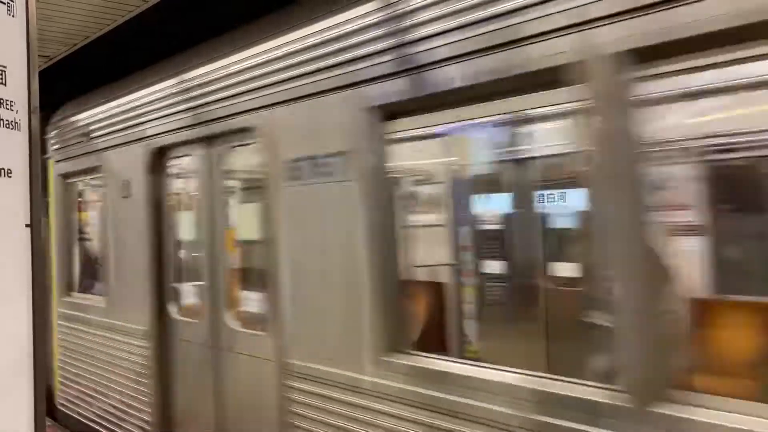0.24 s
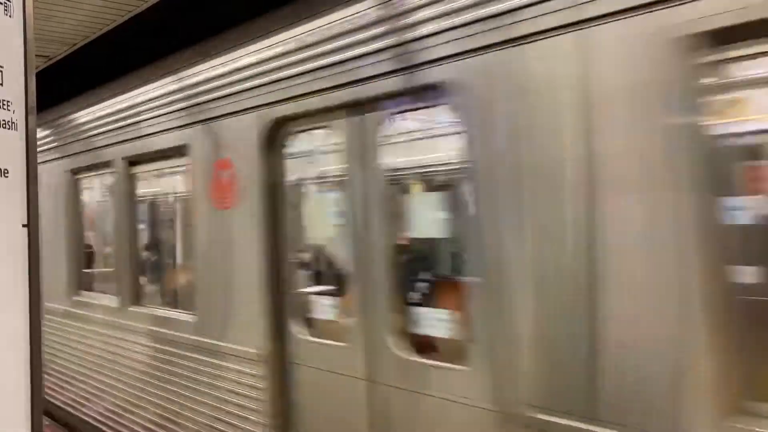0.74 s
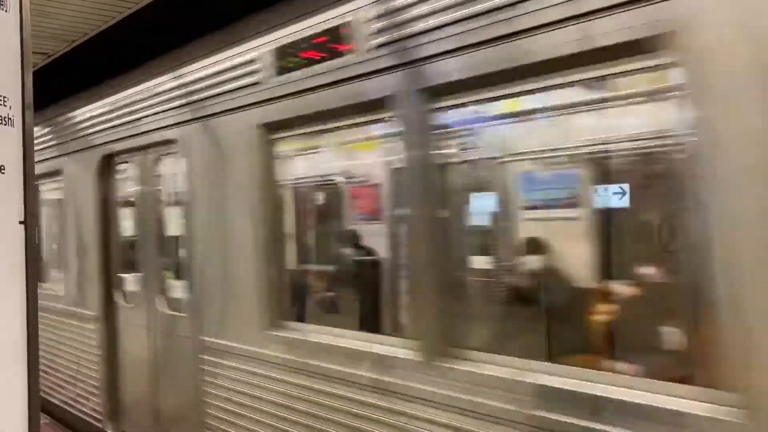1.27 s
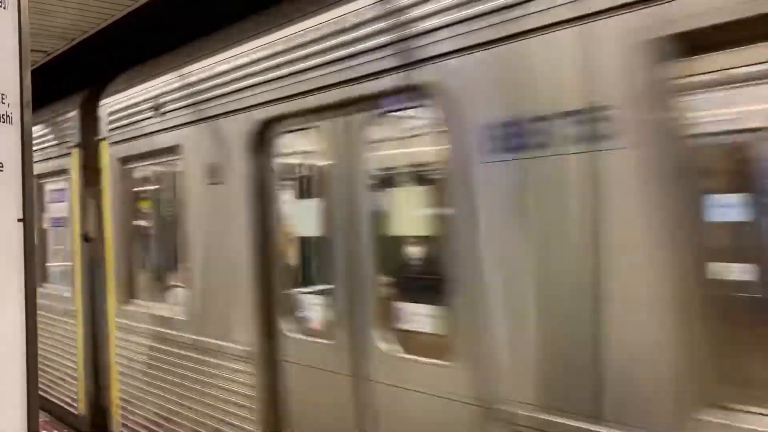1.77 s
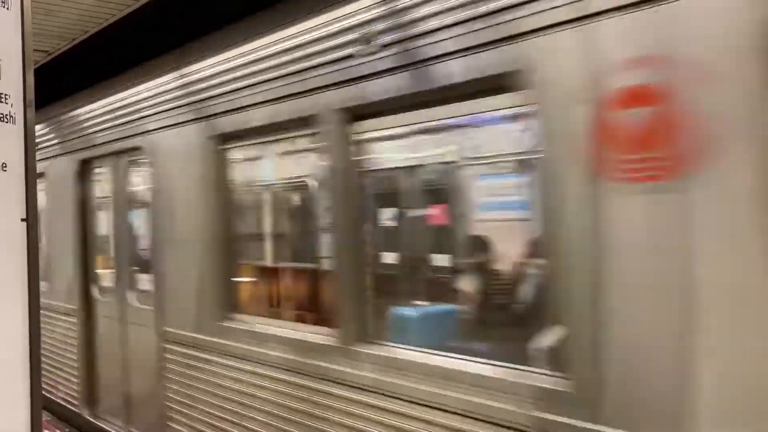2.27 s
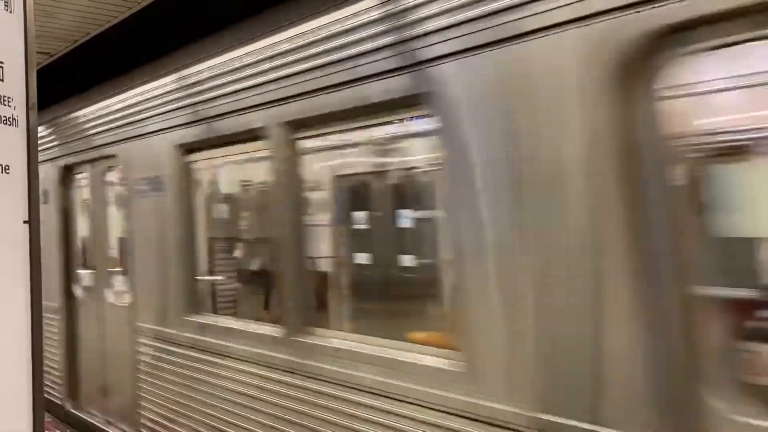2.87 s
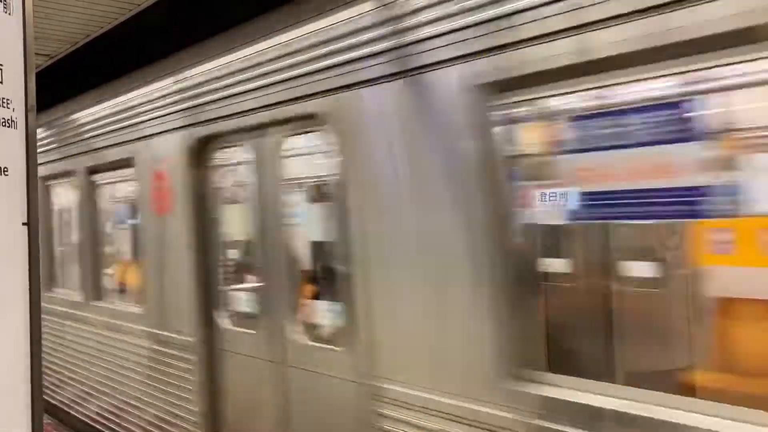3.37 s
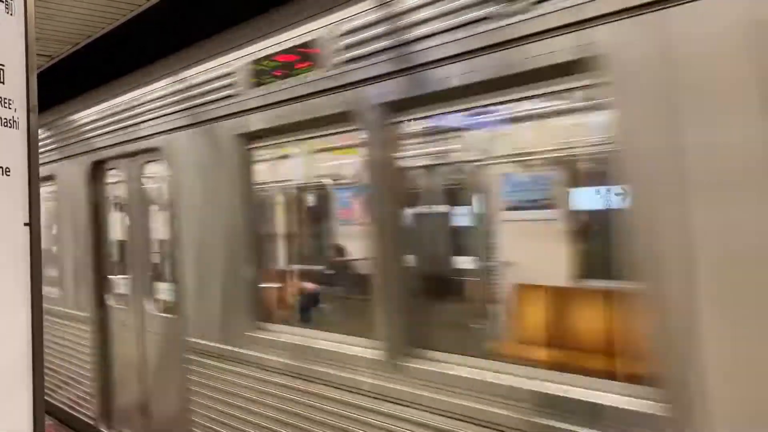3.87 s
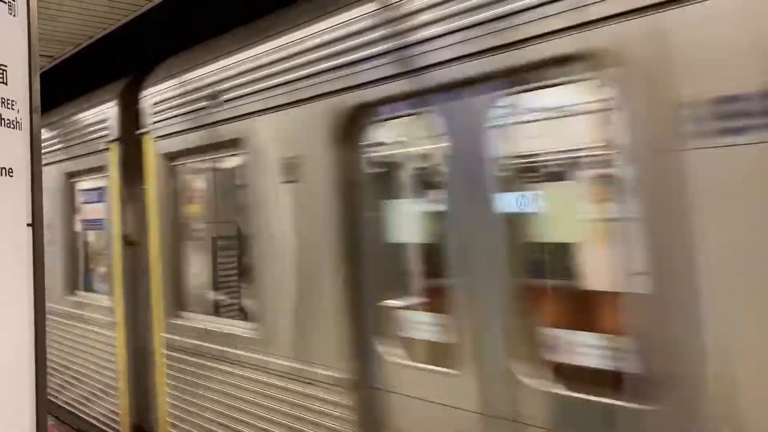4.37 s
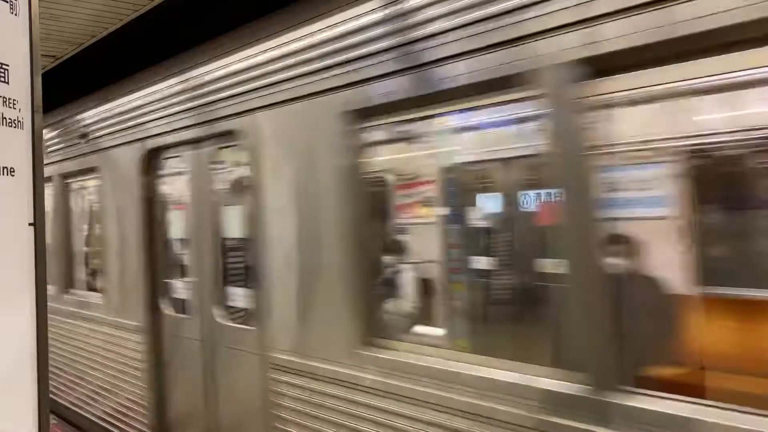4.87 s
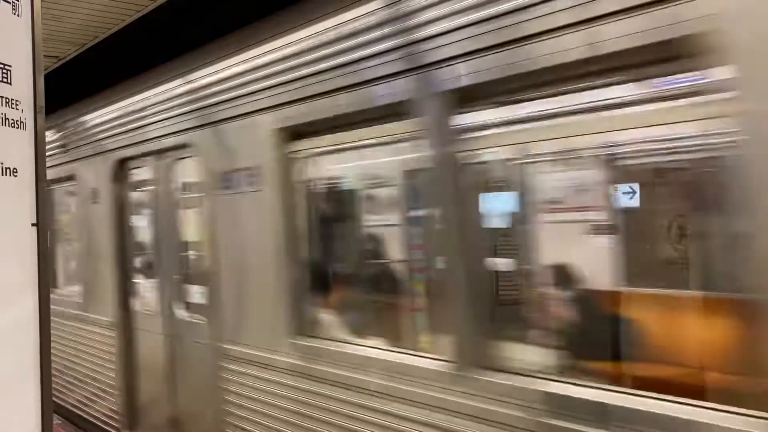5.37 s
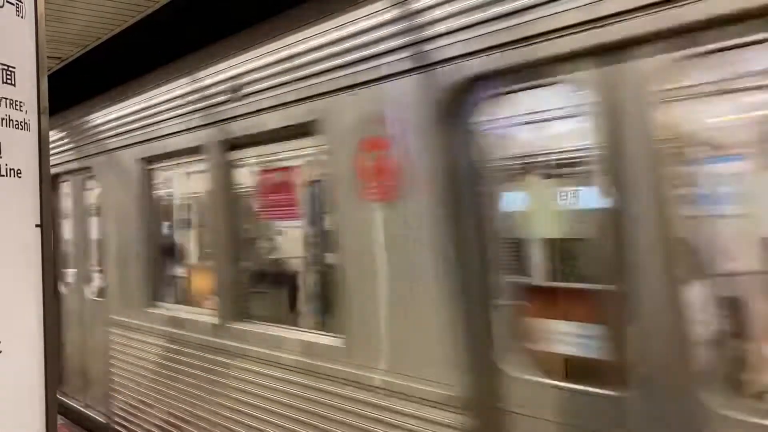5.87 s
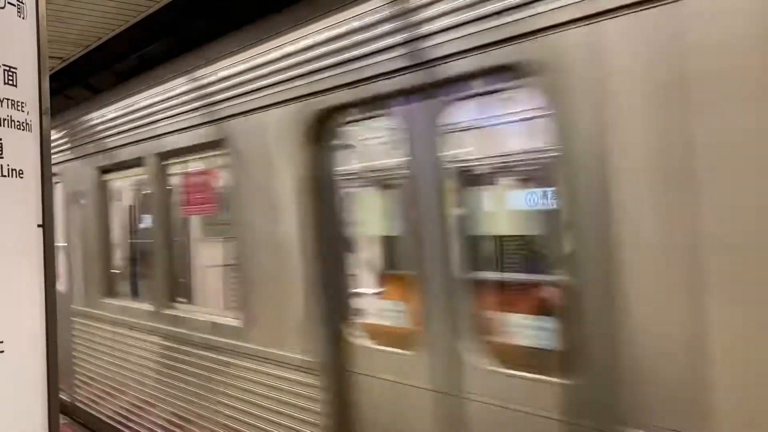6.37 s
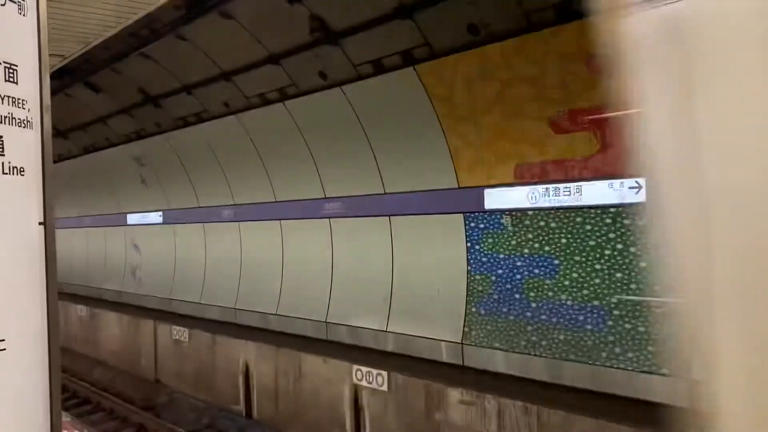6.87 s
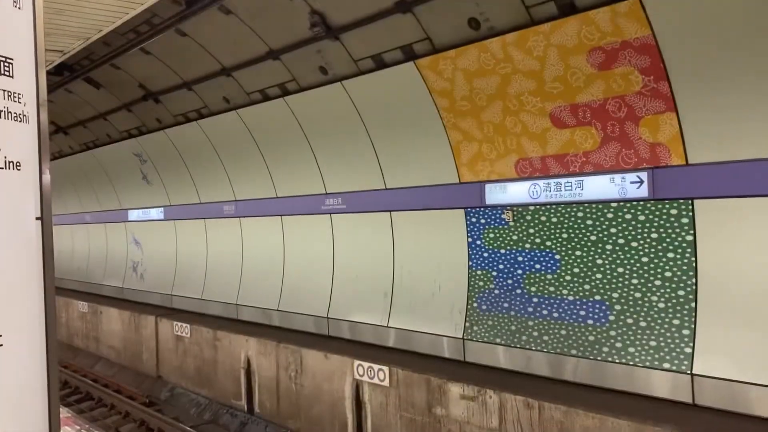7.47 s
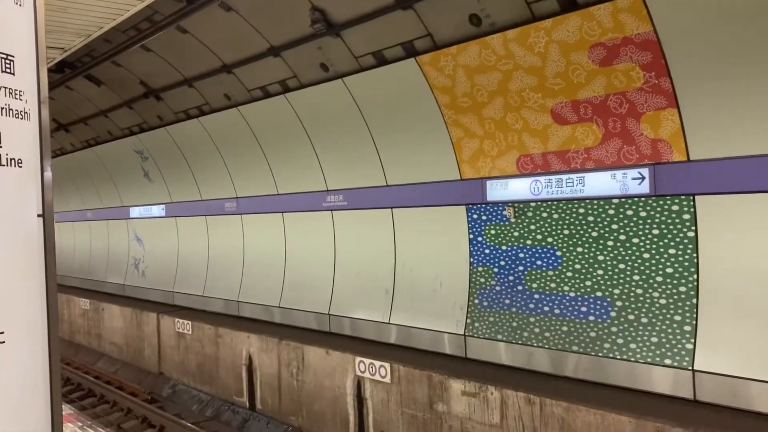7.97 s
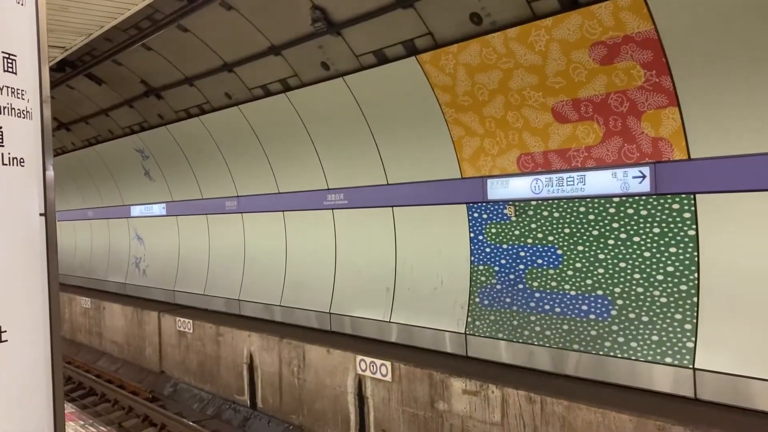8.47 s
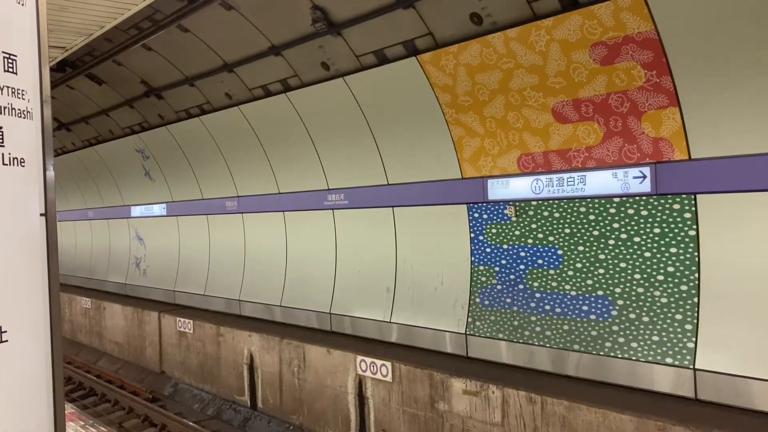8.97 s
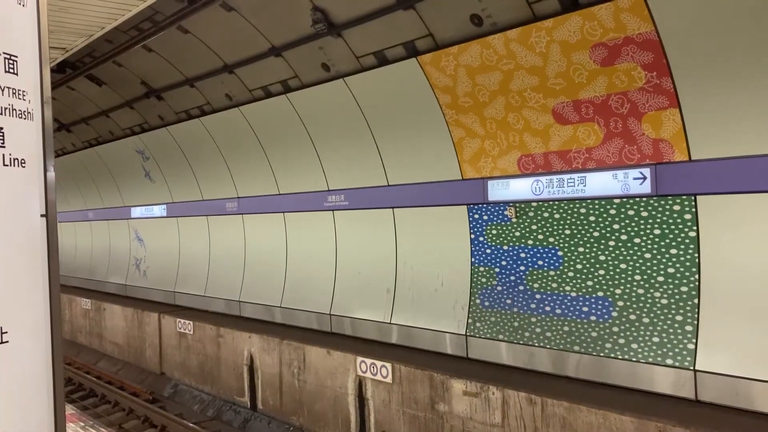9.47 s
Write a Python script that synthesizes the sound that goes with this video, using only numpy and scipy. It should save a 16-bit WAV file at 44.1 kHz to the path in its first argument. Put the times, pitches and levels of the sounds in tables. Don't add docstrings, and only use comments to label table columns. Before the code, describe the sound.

From the first instant an electric train is rolling close past an underground platform, a broad dark roar strongest in the lows and low mids, rough and flickering. Blurred gear hum near 450 Hz rises toward 560, while breathy fan whines climb from about 2.4 to 2.9 kHz, quickest around 1.5 to 2.6 s, with separate whines swelling and sinking per car. Irregular joint thumps, dull clanks, hollow panel booms and short knocks run throughout, heavy at 1.4, 2.25 and 4.1 s, with the biggest bang at 6.2 s. Soft air puffs come at 1.75, 2.3, 5.6 and 6.0 s. The tail passes near 6.8 s; brightness drops, but tunnel rumble surges around 8 and 8.5 s before sinking to a dull distant rumble by 9.7 s. Close stereo pickup, hard-walled station, faint hiss beneath.

```python
import sys
import numpy as np
from scipy import signal
from scipy.fft import rfft, irfft, next_fast_len
from scipy.io import wavfile
from scipy.ndimage import uniform_filter1d

SR = 44100
rng = np.random.default_rng(int(sys.argv[2]) if len(sys.argv) > 2 else 0)


def transcribe(u):
    v = np.clip(np.atleast_2d(u).T, -1, 1)
    q = np.round(v * 32767).astype(np.int16)
    wavfile.write(sys.argv[1], SR, q)


def boost_factor(decibels):
    exponent = np.asarray(decibels, float) / 20
    return 10 ** exponent


N = 429093

# f/Hz, level/dB per Hz
ROLLING_COLOUR = [(25, -42), (40, -13.5), (60, -0.5), (110, -3.5), (300, -0.5), (480, -0.5), (640, -7.5),
                  (1200, -12.5), (1900, -21.5), (2900, -24), (4500, -35.5), (6500, -46), (9000, -46),
                  (11000, -51), (13000, -61), (15000, -68)]
# t/s, loudness level/dB,
# treble level/dB relative to loudness (falls with distance)
TRAIN_PASS = [(0, -18.5, -30.5), (1.15, -16, -30.5), (1.5, -17, -29.5), (1.92, -16, -28.5), (2.4, -17, -28),
              (2.6, -17, -29.5), (4.05, -17.5, -30.5), (5.2, -17, -29.5), (5.75, -16.5, -27),
              (6.25, -16, -31), (6.95, -18, -30.5), (7.15, -16.5, -31.5), (7.97, -15.5, -35.5),
              (8.27, -19, -37), (8.48, -14, -35), (8.68, -15.5, -36), (8.95, -19.5, -39.5),
              (9.73, -23, -39)]
# f/Hz, share of loudness [ratio], share of nearness [ratio]
PITCH_FOLLOWS = [(60, 0.42, 0.84), (252, 0.96, 0.13), (600, 1.72, 0), (2630, 0.46, 0.93), (5500, 1.9, 1.16),
                 (9000, 0.82, 2), (11500, 0.9, 2.5), (15000, .8, 0)]


def rolling(shared_db, own_db):
    loud, near = [curve - curve.mean() for curve in in_time(TRAIN_PASS)]
    shake, follows = track_shake(), np.array(PITCH_FOLLOWS)
    edges = 25 * 2 ** (np.arange(29) / 3)
    lumpy_hz = 100
    together, roar = drift(7), 0
    white = rng.standard_normal((2, 2, N + SR // 4))
    for k, (low, high) in enumerate(zip(edges, edges[1:])):
        third_octave = signal.butter(2, [low, high], "band", fs=SR, output="sos")
        band = signal.sosfilt(third_octave, white[k % 2])[:, -N:]
        hz = np.sqrt(low * high)
        swell = at_hz(follows[:, :2], hz) * loud + at_hz(follows[:, ::2], hz) * near
        swell = swell + shake / (1 + (hz / 189) ** 2)
        flicker = own_db * (1 + lumpy_hz / hz) * np.clip(drift(13.5), -3.0, 1.6)
        roar = roar + boost_factor(at_hz(ROLLING_COLOUR, hz) + swell + shared_db * together + flicker) * band
    return boost_factor(-16.5) * rms_one(fading(at_ports(roar)))


# f/Hz, depth level/dB
ECHO_FADING = [(300, 1.0), (1000, 2), (2500, 1.5), (5500, 2.5), (9000, 3.5)]


def fading(pair):
    hz, _, cells = signal.stft(pair, SR, nperseg=1024)
    field = rng.standard_normal(cells.shape[1:])
    field = uniform_filter1d(field, size=3, axis=0)
    field = rms_one(uniform_filter1d(field, size=5, axis=1))
    gain = boost_factor(at_hz(ECHO_FADING, hz + 1)[:, None] * np.minimum(field, 1.8))
    even = np.sqrt(np.mean(gain ** 2, axis=1, keepdims=True))
    return signal.istft(cells * gain / even, SR)[1][:, :N]


# t/s, peak level/dB, thump f/Hz, clank level/dB
RAIL_JOINTS = [(0.02, -12.5, 70.5, -13.5), (0.74, -16, 65, -19), (1.365, -8, 78, -15),
               (1.411, -7, 131, -15), (1.63, -14, 76, -15), (2.167, -21, 76.5, -30),
               (2.251, -5.5, 80.2, -14.5), (2.479, -17, 70, -28), (2.588, -21, 64.3, -43),
               (3.069, -15, 152, -37), (3.17, -13, 66.4, -31), (3.644, -10, 61.9, -23),
               (3.741, -12, 65, -21), (4.124, -6, 67.4, -35), (4.491, -13.5, 69.6, -33),
               (4.647, -13, 64.5, -27), (4.842, -14, 68, -15), (5.144, -11, 69.4, -33),
               (5.258, -10.5, 84, -19), (5.421, -17.5, 69.6, -14), (5.588, -19, 68.7, -30),
               (5.776, -13, 78.6, -10), (6.219, 1.5, 96, -10), (6.33, -22, 153, -24), (6.658, -17, 72, -23),
               (7.204, -8, 83, -42), (7.381, -24.5, 76, -21), (7.499, -16, 80, -31), (7.63, -16.5, 72, -35),
               (7.868, -14.5, 70, -35), (8.511, -19, 153, -30), (8.527, -24, 84.3, -12),
               (9.019, -18, 64.7, -33), (9.44, -23, 68.5, -32)]


def joints():
    out, t = np.zeros((2, N + SR)), np.arange(SR // 3) / SR
    dull = signal.butter(2, [110, 900], "band", fs=SR, output="sos")
    for s, peak_db, thump_hz, clank_db in RAIL_JOINTS:
        turn = 2 * np.pi * thump_hz * t
        swing = np.sin(turn) + boost_factor(-3 - 60 * t / 0.29) * np.sin(2.58 * turn)
        thump = (1 - np.exp(-(t / 0.0057) ** 2)) * boost_factor(-60 * t / 0.1) * swing
        direct, other = signal.sosfilt(dull, rng.standard_normal((2, len(t))))
        rattle = rms_one(two_ports(direct, other, 300))
        clank = rattle * (1 - np.exp(-(t / 0.006) ** 2)) * boost_factor(-60 * t / 0.12)
        at = round(s * SR)
        out[:, at:at + len(t)] += boost_factor(peak_db) * thump + boost_factor(clank_db) * clank
    return out[:, :N]


def track_shake():
    rise_s, fall_s, shake_db, most_db = 0.034, 0.064, 17, 5
    t, power = np.arange(0, N, 64) / SR, 1
    for s, peak_db, _, _ in RAIL_JOINTS:
        envelope = np.exp(np.minimum((t - s) / rise_s, (s - t) / fall_s))
        power = power + boost_factor(2 * min(peak_db + shake_db, most_db)) * envelope
    return np.interp(np.arange(N) / SR, t, 10 * np.log10(power / power.mean()))


# t/s, f/Hz
GEAR_MESH = [(0, 452.2), (1.2, 470.7), (2.0, 488.6), (2.6, 525.7), (3.2, 532), (4.4, 549.7), (6.7, 563.7),
             (8, 560), (9.73, 566)]
# t/s, gear hum level/dB
BOGIES_PASSING = [(.15, -23.5), (.7, -24.5), (1.25, -23.5), (1.7, -37), (2.0, -19), (2.75, -27),
                  (3.25, -26), (3.9, -26.5), (4.8, -27), (5.7, -26.5), (6.5, -32), (7.0, -40)]
# t/s, f/Hz, level/dB
MAIN_FAN = [(0, 2390, -35.5), (.85, 2400, -39.5), (1.3, 2464, -35.5), (1.8, 2540, -48), (2.2, 2770, -43),
            (2.6, 2854, -39.5), (3.3, 2820, -41), (4.2, 2844, -45.5), (5.2, 2880, -39.5),
            (5.6, 2894, -37.5), (6.1, 2910, -38.5), (6.6, 2900, -45), (7.0, 2920, -43), (7.6, 2880, -42.5),
            (7.9, 2856, -43.5), (8.3, 2876, -47), (8.7, 2826, -47), (9.73, 2840, -48.5)]
# pitch share [ratio], smear f/Hz, level/dB
SIDE_FANS = [(.89, 140, -8), (1.1, 220, -6)]


def motors():
    (mesh_hz,), (fan_hz, fan_db) = in_time(GEAR_MESH), in_time(MAIN_FAN)
    t, waver_hz, pass_s = np.arange(N) / SR, 40, 0.32
    far_power = boost_factor(2 * -27) * boost_factor(2 * in_time(TRAIN_PASS)[0])
    near_power = sum(boost_factor(2 * db) * np.exp(-((t - s) / pass_s) ** 2) for s, db in BOGIES_PASSING)
    hum = blurred_tone(mesh_hz, width_hz=25.4, patchy_db=2.5)
    hum = hum + boost_factor(-4.5) * blurred_tone(.87 * mesh_hz, width_hz=44, patchy_db=1.0)
    whine = blurred_tone(fan_hz + waver_hz * drift(9), width_hz=90, patchy_db=1.6)
    others = 0
    for share, smear_hz, db in SIDE_FANS:
        side_hz = share * fan_hz + 2 * waver_hz * drift(2)
        others = others + boost_factor(db) * blurred_tone(side_hz, smear_hz, patchy_db=1.0)
    nearness = np.interp(t, (1.1, 1.4), [.2, 1])
    return np.sqrt(far_power + near_power) * hum + boost_factor(fan_db) * (whine + nearness * others)


# t/s, f/Hz, level/dB
LONE_FANS = [
    [(0, 2270, -37), (.45, 2318, -38), (.9, 2290, -37), (1.2, 2370, -50)],
    [(.9, 2100, -52), (1.15, 2140, -42), (1.7, 2046, -47), (2.0, 2060, -52)],
    [(1.1, 2570, -48), (1.5, 2600, -39), (1.95, 2730, -41), (2.1, 2880, -54)],
    [(1.5, 2230, -54), (1.7, 2316, -41), (1.95, 2480, -36), (2.15, 2530, -50)],
    [(1.9, 2290, -44), (2.05, 2357, -35), (2.25, 2634, -44), (2.42, 3120, -40), (2.6, 2960, -50)],
    [(2.6, 2620, -52), (2.75, 2690, -42), (2.9, 2850, -44), (3.0, 2950, -52)],
    [(2.75, 2280, -49), (2.95, 2320, -38), (3.3, 2500, -45), (3.45, 2550, -52)],
    [(4.5, 2420, -52), (4.75, 2460, -45), (5.25, 2410, -42), (5.7, 2430, -40), (6.3, 2420, -44)],
    [(5.3, 2200, -52), (5.6, 2200, -39), (5.9, 2200, -49)],
]


def car_fans():
    out = np.zeros((2, N))
    for car in LONE_FANS:
        heard = slice(round(car[0][0] * SR), round(car[-1][0] * SR))
        hz, db = in_time(car)[:, heard]
        out[:, heard] += boost_factor(db) * blurred_tone(hz, width_hz=44.0, patchy_db=3.0)
    return out


def blurred_tone(hz, width_hz, patchy_db):
    turn, size = np.exp(2j * np.pi * np.cumsum(hz) / SR), len(hz)
    direct, other = [np.real((drift(width_hz, size) + 1j * drift(width_hz, size)) * turn) for port in range(2)]
    return rms_one(boost_factor(patchy_db * drift(7.2, size)) * two_ports(direct, other, hz.mean()))


# f/Hz, level/dB, t60/s
RIM_MODES = [(1772, 0, .02), (2097, 2, .018), (2377, 1, .015), (2610, 1, .015), (2860, 0, .015),
             (3350, -1, .012)]


def wheel_rims():
    loud_db, near_db = in_time(TRAIN_PASS)
    return boost_factor(0.83 * loud_db + 0.45 * near_db - 13.0) * wheel_ring(RIM_MODES, knocks_per_s=300)


# f/Hz, level/dB, t60/s
PANEL_MODES = [(218.6, -3.5, 0.11), (282, -10.5, 0.18), (350.4, -6, 0.27), (408.2, -1, 0.15),
               (830, -4, 0.051)]


def body_panels():
    loud_db, near_db = in_time(TRAIN_PASS)
    return boost_factor(loud_db + 0.33 * near_db + 0.1) * wheel_ring(PANEL_MODES, knocks_per_s=120)


def wheel_ring(modes, knocks_per_s):
    knocks = (rng.random((2, N)) < knocks_per_s / SR) * rng.standard_normal((2, N)) + 1e-18
    dealt, out = rng.integers(0, len(modes), N), 0
    for k, (hz, level_db, t60) in enumerate(modes):
        r, w = boost_factor(-60 / (t60 * SR)), 2 * np.pi * hz / SR
        ring = signal.lfilter([0, np.sin(w)], [1, -2 * r * np.cos(w), r * r], knocks * (dealt == k))
        out = out + boost_factor(level_db) * ring
    soft = signal.butter(4, 1.77 * modes[-1][0], fs=SR, output="sos")
    return rms_one(at_ports(signal.sosfilt(soft, out)))


# t/s (at its height), level/dB, f/Hz
PANEL_BOOMS = [(0.385, -11.5, 497), (0.435, -14.5, 191), (0.548, -6.5, 405), (1.075, -23, 266),
               (0.13, -14, 390), (0.22, -11, 396), (0.735, -14, 369), (1.045, -12, 465), (1.326, -18, 313),
               (1.383, -9, 189), (1.707, -9, 316), (1.864, -8.5, 447), (1.445, -13.5, 456.2),
               (1.91, -13, 453), (1.975, -7, 405), (1.988, -10, 200), (2.093, -13, 190), (2.248, -12, 408),
               (2.445, -17, 505), (2.82, -13, 528), (2.271, -11, 158), (2.524, -12.5, 160),
               (2.898, -10.5, 377.5), (3.156, -13.5, 397), (3.296, -10.5, 180), (3.461, -16, 491),
               (3.746, -13, 312), (3.905, -12, 181), (4.234, -16, 400), (4.345, -16, 394),
               (4.693, -11.5, 160), (4.701, -10.5, 546), (5.144, -20, 365), (5.595, -15, 557),
               (5.82, -15.5, 410), (6.412, -14, 428.5), (5.327, -9.5, 278.4), (5.746, -13, 410),
               (5.771, -12, 280), (5.909, -10, 282), (6.09, -20, 181), (6.219, -3, 409),
               (6.224, -15.5, 272), (6.229, -14.5, 141), (6.336, -12.5, 152), (6.649, -30, 182),
               (7.131, -20, 170), (7.372, -11.5, 318), (7.726, -15, 420), (7.91, -12.5, 384),
               (7.97, -12, 417), (8.399, -13, 300), (8.45, -11, 340), (8.499, -16, 190), (8.532, -17, 291),
               (8.537, -10.5, 406), (8.554, -26, 530), (8.593, -13.5, 203), (8.62, -17, 381),
               (8.783, -21, 488)]


def panel_booms():
    return booms(PANEL_BOOMS, rise_s=.016, fall_s=0.011, gain_db=-3.5)


# t/s (onset), peak level/dB, f/Hz
TREAD_KNOCKS = [(0.034, -18.5, 556), (0.977, -10.5, 546), (1.297, -5.5, 495), (1.466, -17, 545),
                (1.895, -6, 514), (2.183, -6.5, 486), (2.349, -11.5, 522), (3.792, -14.5, 554),
                (4.259, -24, 620), (4.382, -13, 576), (4.853, -6, 533), (5.37, -14.5, 555),
                (5.406, -12, 552), (6.605, -10, 550)]


def tread_knocks():
    rise_s = 0.00402
    at_height = [(s + rise_s, db, hz) for s, db, hz in TREAD_KNOCKS]
    return booms(at_height, rise_s, fall_s=0.014, gain_db=-6)


def booms(table, rise_s, fall_s, gain_db):
    lead = SR // 10
    out, t = np.zeros((2, N + 2 * lead)), np.arange(-lead, lead) / SR
    swell = np.exp(-(t / np.where(t < 0, rise_s, fall_s)) ** 2)
    phases = rng.uniform(0, 2 * np.pi, (len(table), 2))
    for (s, level_db, hz), (start, apart) in zip(table, phases):
        turn = 2 * np.pi * hz * t + start
        pair = two_ports(np.sin(turn), np.sin(turn + apart), hz)
        at = round(s * SR)
        out[:, at:at + len(t)] += boost_factor(level_db + gain_db) * swell * pair
    return out[:, lead:lead + N]


# t/s, length/s, level/dB
AIR_PUFFS = [
    (1.75, 0.12, -49),
    (2.3, 0.11, -54),
    (4.25, .1, -63),
    (5.6, 0.16, -50),
    (5.983, 0.14, -47.5),
    (9.427, 0.12, -60),
]


def valves():
    t, edge_s, gate = np.arange(N) / SR, 0.051, 0
    for s, length, db in AIR_PUFFS:
        opening = np.minimum(t - s, s + length - t) / edge_s + .5
        gate = gate + boost_factor(db) * np.clip(opening, 0, 1)
    white = at_ports(rng.standard_normal((2, N)))
    jets = signal.sosfilt(signal.butter(4, (6700, 11400), "band", fs=SR, output="sos"), white)
    hiss = np.diff(white[:, ::-1], 2, prepend=[[0, 0]] * 2)
    return gate * rms_one(jets) + boost_factor(-77) * rms_one(hiss)


# f/Hz, likeness [ratio, clipped to
PORT_LIKENESS = [(30, 0.7), (70, 0.81), (300, 0.89), (700, 0.67), (1100, 0.69), (2100, 0.19),
                 (2700, -0.031), (4500, 0.33), (6000, -0.46), (7000, -0.94), (8300, -1.9), (13000, -1.4)]
# f/Hz, left minus right level/dB
PORT_TILT = [(60, 0.5), (110, -0.5), (190, 0.5), (350, 1), (630, 1), (1140, 3), (2050, 0.5), (3700, 1),
             (6670, -1), (12000, 0.5)]


def two_ports(direct, other, hz):
    alike = np.clip(at_hz(PORT_LIKENESS, hz), -.993, .993)
    pair = np.sqrt(1 + alike) * direct + np.sqrt(1 - alike) * other * [[1], [-1]]
    return pair * boost_factor(at_hz(PORT_TILT, hz) * np.array([[.5], [-.5]]))


def at_ports(pair):
    size = next_fast_len(N)
    direct, other = rfft(pair, size)
    return irfft(two_ports(direct, other, np.fft.rfftfreq(size, 1 / SR) + 1), size)[:, :N]


def in_time(rows):
    s, *columns = np.transpose(rows)
    return np.array([np.interp(np.arange(N) / SR, s, column) for column in columns])


def at_hz(points, hz):
    table_hz, values = np.array(points)[:, 0], np.array(points)[:, 1]
    return np.interp(np.log(hz), np.log(table_hz), values)


def rms_one(x):
    return x / np.sqrt(np.mean(np.abs(x) ** 2) + 1e-20)


def drift(rate, size=N):
    r = np.exp(-40 * np.pi * rate / SR)
    slow = signal.lfilter([1], [1, -2 * r, r * r], rng.standard_normal(size // 20 + 4002))[4000:]
    return np.interp(np.arange(size) / 20, np.arange(len(slow)), rms_one(slow))


def scene():
    train = rolling(shared_db=-0.22, own_db=1.21) + joints() + motors() + car_fans()
    train = train + wheel_rims() + body_panels() + panel_booms() + tread_knocks()
    left, right = train + valves()
    size, left_lag_s = next_fast_len(N + 64), 2.19e-4
    late = np.exp(-2j * np.pi * np.fft.rfftfreq(size, 1 / SR) * left_lag_s)
    return np.array([irfft(rfft(left, size) * late, size)[:N], right])


def low_pass(x):
    return signal.sosfilt(signal.butter(12, 15600, fs=SR, output="sos"), x)


def record(dry):
    ring = signal.lfilter(*signal.iirpeak(15100, 17, SR), dry)
    heard = dry + 1.2 * ring
    top = 1.05
    return low_pass(top * np.tanh(heard / top))


dry = scene()
out = record(dry)
transcribe(out)
```